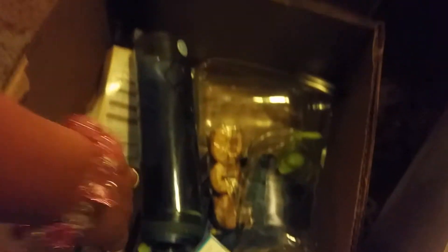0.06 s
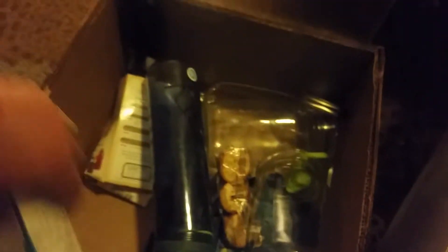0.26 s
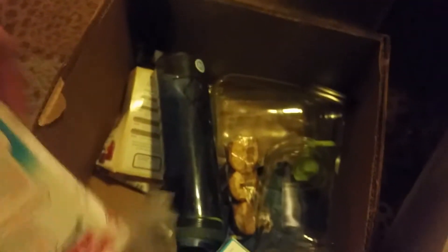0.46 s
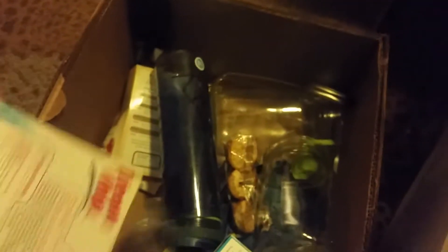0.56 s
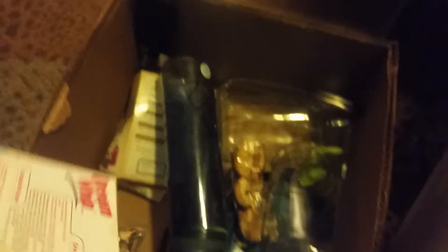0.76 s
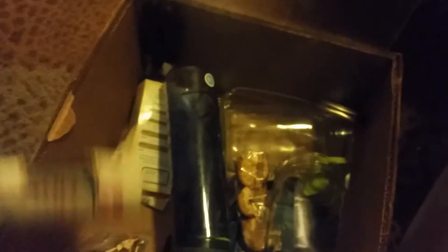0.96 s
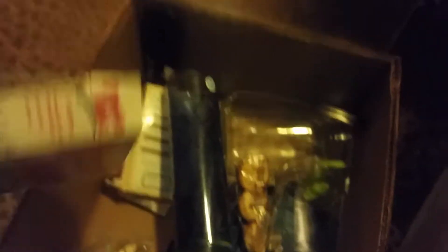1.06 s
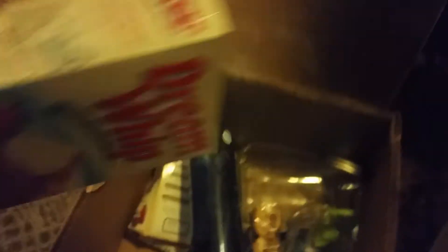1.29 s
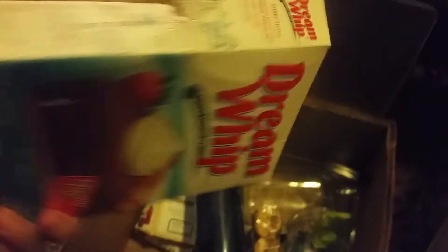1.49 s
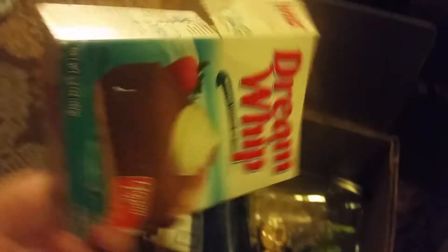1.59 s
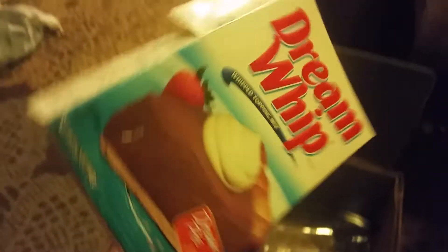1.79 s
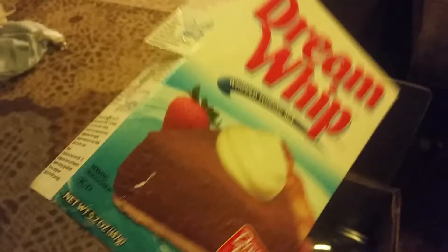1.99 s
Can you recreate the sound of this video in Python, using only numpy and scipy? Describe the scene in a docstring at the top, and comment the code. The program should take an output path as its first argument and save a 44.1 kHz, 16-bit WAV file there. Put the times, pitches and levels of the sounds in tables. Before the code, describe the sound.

Glassware clinks sharply for about a second as a small carton scrapes out of a cardboard box, bumping its walls. Then fingers tick faintly on the carton over a low appliance hum, close up in a quiet room.

```python
"""A quiet room, up close: a small carton is dragged out of a cardboard box full of glassware.
Card scrapes on card, the box walls boom and slap, and a wide jar, a bottle and a small glass clink
together, each contact a sharp crack and a wavering ring. Then fingers tick on the carton over a low
appliance hum, while the gain control holds and slowly recovers from the loudest clink."""
import sys
import numpy as np
from scipy import signal
from scipy.fft import rfft, irfft, next_fast_len
from scipy.io import wavfile
from scipy.ndimage import uniform_filter1d, minimum_filter1d, map_coordinates

SR = 44100
rng = np.random.default_rng(int(sys.argv[2]) if len(sys.argv) > 2 else 0)


def int16_out(signal):
    """Quantize to a 16-bit WAV file."""
    q = np.round(np.clip(np.atleast_2d(signal).T, -1, 1) * 32767)
    wavfile.write(sys.argv[1], SR, q.astype(np.int16))


N = 90140
HIT_S, RING_ATTACK_S = .32, .001

# the five registers of a clink, low to high: f/Hz
REGISTERS_HZ = [2100, 3100, 6000, 10000, 14000]


def amp(db):
    """Decibels to gain."""
    return 10 ** (np.asarray(db) / 20)


def unit(x):
    """Scale to rms 1."""
    return x / np.sqrt(np.mean(x ** 2) + 1e-20)


def along(points, hz):
    """Read a curve of (f/Hz, value) points on a log frequency axis."""
    f, v = np.transpose(points)
    return np.interp(np.log(hz + 1), np.log(f + 1), v)


def decay(t, t60):
    """An envelope that falls 60 dB in t60 seconds."""
    return np.exp(-np.log(1000) * t / t60)


def filtered(x, response):
    """EQ x with a gain given as a function of frequency."""
    size = next_fast_len(x.shape[-1] + 4096)
    gain = response(np.fft.rfftfreq(size, 1 / SR))
    return irfft(rfft(x, size) * gain, size)[..., :x.shape[-1]]


def add(track, s, sound):
    """Mix a sound in at s seconds."""
    part = track[:, max(round(s * SR), 0):][:, :sound.shape[1]]
    part += sound[:, :part.shape[1]]


def noise(spectrum, size):
    """Coloured stereo noise of rms 1, nearly mono in the bass and wide in the mids."""
    # likeness of left and right: f/Hz, correlation
    likeness = [(60, 0.89), (350, 0.7), (700, 0.031), (1500, 0.02), (15000, 0.49)]

    def mid_side_gains(hz):
        width = np.arccos(np.clip(along(likeness, hz), -1, 1)) / 2
        return amp(along(spectrum, hz)) * [np.cos(width), np.sin(width)]

    mid, side = filtered(rng.standard_normal((2, size)), mid_side_gains)
    return unit(np.array([mid + side, mid - side]))


def burst(spectrum, t60, attack_s=.0003):
    """The dying noise of one contact."""
    t = np.arange(int(HIT_S * SR)) / SR
    return noise(spectrum, len(t)) * decay(t, t60) * (1 - np.exp(-t / attack_s))


def ring(modes, attack_s=RING_ATTACK_S, rattling=0):
    """Damped modes (f/Hz, level/dB, t60/s); loose contact makes them waver, the high ones most."""
    scatter_db, rattle_db, rattle_hz = 1.5, 2.5, 130
    t = np.arange(int(HIT_S * SR)) / SR
    out = 0
    for k, (hz, db, t60) in enumerate(modes):
        height = hz / REGISTERS_HZ[0]
        right_phase = np.array([[0], [rng.uniform(-2, 2) * min(height, 1)]])  # ports are out of step
        swell, drift = [rattling * np.interp(t * rattle_hz, np.arange(len(points)), points)
                        for points in rng.standard_normal((2, 64))]
        level = amp(db + scatter_db * rng.normal() + rattle_db * swell) * decay(t, t60)
        phase = 2 * np.pi * hz * t + right_phase + .45 * np.sqrt(height) * drift
        out = out + (-1) ** k * level * np.sin(phase)
    return out * (1 - np.exp(-t / attack_s))


def room_tone():
    """The bed: steady air noise and the two-note hum of an appliance."""
    # colour of the air: f/Hz, level/dB
    air = [(20, -2), (40, -1), (90, -3), (180, -2), (280, -6.5), (380, -7.5), (550, -9.5), (850, -11.5),
           (1400, -26), (3000, -30), (5000, -27.5), (6600, -20.5), (8200, -52.5), (15000, -51)]
    t = np.arange(N) / SR
    hum = amp(-41.5) * np.sin(2 * np.pi * 58.7 * t) + amp(-52.5) * np.sin(2 * np.pi * 372 * t)
    return amp(-44.5) * noise(air, N) + hum


def room_reverb(x):
    """A short, dark tail from the box and the furnished room."""
    # reverb time: f/Hz, t60/s
    reverb_time = [(200, 0.27), (2000, 0.35), (6000, 0.087), (14000, 0.097)]
    hz, t, bands = signal.stft(rng.standard_normal((2, SR // 2)), SR, nperseg=256)
    _, tail = signal.istft(bands * decay(t, along(reverb_time, hz)[:, None]), SR, nperseg=256)
    return signal.fftconvolve(x, tail / np.linalg.norm(tail[0]), axes=1)[:, :N]


def box():
    """The bumped cardboard wall booms and slaps; the floor thumps as weight settles on it."""
    # the carton hits the wall: t/s, wall pitch/Hz, boom/dB, slap/dB
    bumps = [(.0405, 370, -20.5, -19), (0.057, 360, -31.5, -19.5), (.068, 360.5, -17.5, -22),
             (0.083, 351.4, -20, -19), (.118, 377, -33, -38), (0.3591, 351.7, -16, -20.5),
             (0.374, 353.8, -31, -25), (0.39, 373.8, -22.5, -26), (0.547, 326.3, -22, -15),
             (0.7112, 399, -18, -31), (0.7157, 405.3, -16.5, -13), (0.85, 470, -28, -25)]
    # wall modes: ratio to the wall pitch, level/dB, t60/s
    wall_modes = [(.66, -13, .1), (.93, -5, 0.11), (1, 1.5, .16), (1.15, -5.5, .09), (1.35, -24.5, 0.044)]
    # colour of the slap: f/Hz, level/dB
    slap = [(60, -15), (200, 1), (430, 2), (620, -5.5), (900, -3), (1600, -3.5), (2400, -12), (6000, -33),
            (15000, -25)]
    # weight lands on the box floor: t/s, level/dB
    thumps = [(.085, -28.5), (0.314, -31), (.549, -26), (0.606, -10.5), (0.647, -20)]
    # box floor modes: f/Hz, level/dB, t60/s
    floor_modes = [(90, -24.5, .12), (138, 1, 0.049), (185.5, -3.5, 0.12), (237.5, -0.5, 0.057),
                   (313, -4.5, .08)]
    out = np.zeros((2, N))
    for s, pitch_hz, boom_db, slap_db in bumps:
        boom = ring([(pitch_hz * ratio, db, t60) for ratio, db, t60 in wall_modes])
        add(out, s, amp(boom_db) * boom + amp(slap_db) * burst(slap, t60=.1))
    for s, db in thumps:
        add(out, s, amp(db) * ring(floor_modes, attack_s=.0022))
    return out


def carton(grain_db=3, grain_hz=890):
    """Grainy friction of card on card until the carton is free; its edges and the fingers tick."""
    # fader curve of the scrape: t/s, level/dB
    slide = [(0, -34), (.04, -33), (.08, -23.5), (.14, -33.5), (.23, -32), (.33, -29.5), (.42, -33.5),
             (.49, -26), (.56, -28.5), (.66, -19.5), (.73, -26.5), (.81, -27), (.88, -37.5), (.98, -74.5)]
    # colour of the scrape: f/Hz, level/dB
    scrape = [(80, -6), (200, -0.5), (380, 0.5), (700, -6.5), (2200, -12.5), (4000, -6.5), (6500, 1.5),
              (8200, -8.5), (11000, -14), (15000, -22)]
    # edge and finger ticks: t/s, level/dB
    ticks = [(0.06, -15.5), (0.1047, -11.5), (0.174, -27), (0.484, -21.5), (.509, -15.5), (0.9, -31),
             (1.114, -41), (1.1344, -46), (1.2128, -39.5), (1.4573, -27), (1.6684, -47)]
    # colour of a tick: f/Hz, level/dB
    tick = [(300, -29), (2000, -23), (3800, -5.5), (5300, 0.5), (6200, -2.5), (7000, -2), (8500, -18),
            (11000, -32), (15000, -44)]
    # ping of the card's stiff edge: f/Hz, level/dB, t60/s
    edge_modes = [(5310, 4, .014), (6000, 0, 0.01)]
    t = np.arange(N) / SR
    grain = map_coordinates(rng.standard_normal(N), [t * grain_hz])
    friction = unit(amp(grain_db * grain) * noise(scrape, N))
    out = amp(np.interp(t, *np.transpose(slide))) * friction
    for s, db in ticks:
        add(out, s, amp(db) * (burst(tick, t60=.013) + ring(edge_modes)))
    return out


def shiver(strike_colour, count=110, t60=.18):
    """The neighbouring glassware shivers along with a clink in a dense cluster of weak modes."""
    # colour of the cluster: f/Hz, level/dB
    colour = [(1900, -10.5), (3000, 4), (5000, -11), (7000, 7), (8000, -14), (9500, 4), (12000, -11.5),
              (15000, -8.5)]
    t = np.arange(int(HIT_S * SR)) / SR
    hz = rng.uniform(1900, 15500, count)
    levels = amp(along(colour, hz) + along(strike_colour, hz))
    spectrum = np.zeros((2, len(t) // 2 + 1), complex)
    spectrum[:, (hz * len(t) / SR).astype(int)] = levels * np.exp(2j * np.pi * rng.random((2, count)))
    cluster = irfft(spectrum, len(t)) * len(t) / np.sqrt(2 * count)
    return cluster * decay(t, t60) * (1 - np.exp(-t / RING_ATTACK_S))


def glassware(damping_slope=.17):
    """Each contact cracks and rings one vessel; the spot struck sets the level of each register."""
    # clinks of each vessel: t/s, level/dB in each of the five registers, crack/dB
    jar_clinks = [(.250, -38.5, -33.5, -49, -50.5, -57.5, -50.5), (.2555, -23, -17.5, -15, -18, -22.5, -19),
                  (.272, -21, -21.5, -10.5, -44.5, -29.5, -22),
                  (.290, -20.5, -26.5, -34.5, -32.5, -38.5, -39.5),
                  (.4315, -17.5, -17.5, -15.5, -20, -29.5, -24), (.446, -22, -34, -28.5, -32.5, -37.5, -38),
                  (.462, -25, -24.5, -30.5, -31, -44, -36), (.684, -27, -44, -16, -23.5, -45, -38.5),
                  (.7455, -17.5, -2.5, -21, -21.5, -21.5, -5.5), (.781, -20, -17, -52, -38, -33.5, -25),
                  (.9115, -25, -17, -18.5, -43, -32.5, -20), (.940, -31, -27, -27, -34, -37, -54)]
    bottle_clinks = [(.498, -37, -30, -25.5, -22.5, -24.5, -16.5),
                     (.517, -37, -22, -19.5, -10.5, -9.5, -19.5),
                     (.533, -46, -39, -26.5, -22.5, -14.5, -32), (.556, -44, -32, -31, -20, -17.5, -28),
                     (.5965, -21.5, -15, -2.5, -10, -15.5, -7), (.614, -18, -15.5, -26, -1.5, -11, -10),
                     (.627, -20, -7, -15, -22, -10, -5), (.718, -38, -55, -19, -22, -17.5, -20),
                     (.796, -31, -20.5, -18, -22, -32.5, -20), (.812, -35, -49, -21.5, -30, -37, -39.5)]
    glass_clinks = [(0.046, -41, -22, -25.5, -45, -38.5, -32),
                    (.361, -44.5, -33.5, -26.5, -20.5, -37.5, -36.5),
                    (.389, -23, -31, -16.5, -29, -41.5, -20)]
    # modes of each vessel: f/Hz
    jar_hz = [2072, 2138, 2535, 2750, 3062, 3830, 4735, 5190, 5345, 5430, 6360, 7058, 9410, 10230, 11700]
    bottle_hz = [3050, 3180, 6120, 6250, 6830, 7044, 7415, 8904, 8970, 9390, 9470, 9575, 10350, 11200,
                 12120, 12650, 13500, 13560, 14490]
    glass_hz = [2740, 4683, 4823, 6490, 7311, 8640]
    # balance of those modes: level/dB
    jar_db = [0, 2, -14, -16.5, -3, -9, -16, -0.5, -9.5, 3, -10.5, -6, -12.5, -5.5, -14]
    bottle_db = [1.5, -5, 5.5, -2.5, -7, -10, -4.5, -4.5, -11, 3, -5, -11, -13.5, -11, -23, -16.5, -9.5,
                 -11.5, -5.5]
    glass_db = [-3.5, -3.5, -3, -5.5, -5, -1.5]
    # colour of the glass-on-glass crack: f/Hz, level/dB
    crack = [(200, -16), (1200, -6), (2600, -10.5), (4000, 6.5), (6500, -1.5), (8000, -10.5), (10000, -4.5),
             (15000, -32.5)]
    jar_t60, bottle_t60, glass_t60 = .18, .12, .19  # s at the lowest register; higher modes die sooner
    vessels = [(jar_clinks, jar_hz, jar_db, jar_t60),
               (bottle_clinks, bottle_hz, bottle_db, bottle_t60),
               (glass_clinks, glass_hz, glass_db, glass_t60)]
    out = np.zeros((2, N))
    for clinks, mode_hz, mode_db, t60 in vessels:
        for s, *register_db, crack_db in clinks:
            strike_colour = list(zip(REGISTERS_HZ, register_db))
            modes = [(hz, db + along(strike_colour, hz), t60 * (REGISTERS_HZ[0] / hz) ** damping_slope)
                     for hz, db in zip(mode_hz, mode_db)]
            ringing = ring(modes, rattling=1) + amp(-2.5) * shiver(strike_colour)
            add(out, s, ringing + amp(crack_db) * burst(crack, t60=.04))
    return out


def scene():
    """The close sources and their reverb over the room tone."""
    close = glassware() + box() + carton()
    return close + amp(-11) * room_reverb(close) + room_tone()


def gain_control(x):
    """A loud moment on the left channel ducks both; the gain holds, then creeps back."""
    threshold_db, range_db = -13, 7.5
    attack_s, hold_s, release_db_per_s = .012, .8, 17
    level_db = 10 * np.log10(np.abs(uniform_filter1d(x[0] ** 2, size=256)) + 1e-12)
    cut_db = np.clip(level_db - threshold_db, 0, range_db)
    half_hold = int(hold_s * SR) // 2
    held_db = -minimum_filter1d(-cut_db, 2 * half_hold + 1, origin=half_hold, mode="constant")
    ramp_db = release_db_per_s * np.arange(N) / SR
    released_db = np.maximum.accumulate(held_db + ramp_db) - ramp_db
    pole = np.exp(-1 / (attack_s * SR))
    return x * amp(-signal.lfilter([1 - pole], [1, -pole], released_db))


def record(dry):
    """A stereo microphone with a shaded right port, then gain control, clipping and a top cut."""
    # EQ of the shaded port: f/Hz, level/dB
    shading = [(90, 0.5), (200, -2.5), (380, -5.5), (1300, -7.5), (2100, -3), (3000, -13), (4400, -18),
               (7000, -26), (9400, -13.5), (11500, 1.5), (15000, -3.5)]
    right = filtered(dry[1], lambda hz: amp(along(shading, hz)))
    clipped = np.clip(gain_control(np.array([dry[0], right])), -1, 1)
    return filtered(clipped, lambda hz: hz < 15500)


dry = scene()
out = record(dry)
int16_out(out)
```